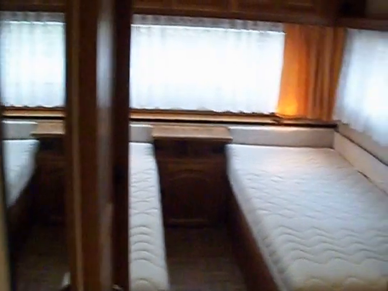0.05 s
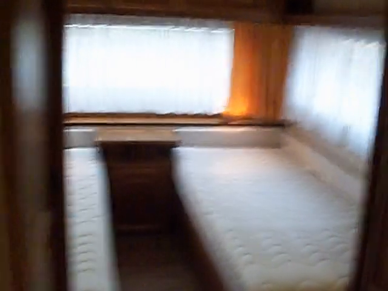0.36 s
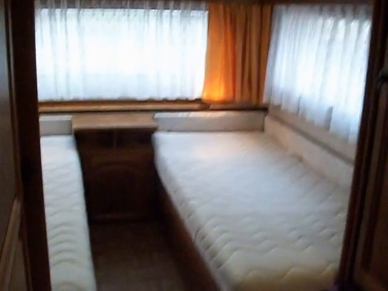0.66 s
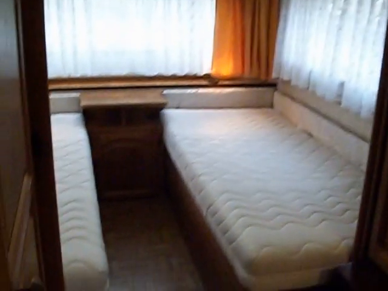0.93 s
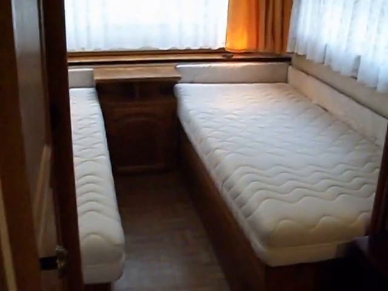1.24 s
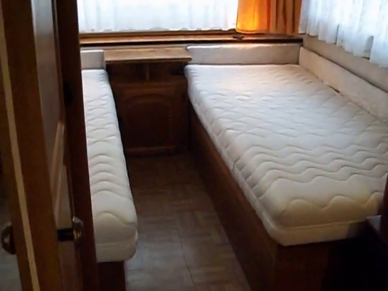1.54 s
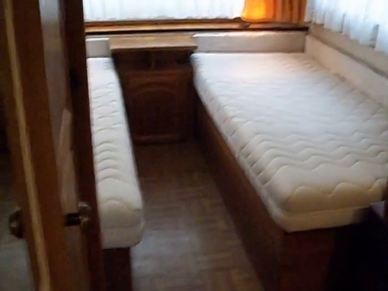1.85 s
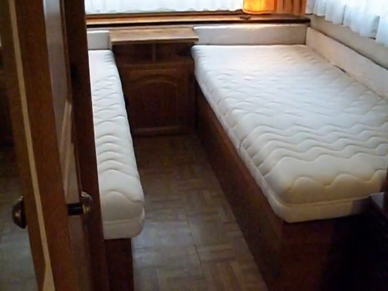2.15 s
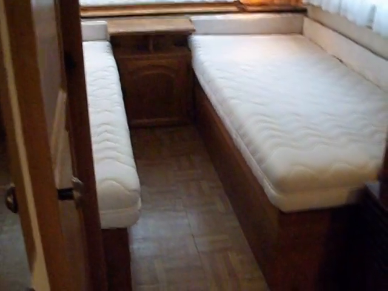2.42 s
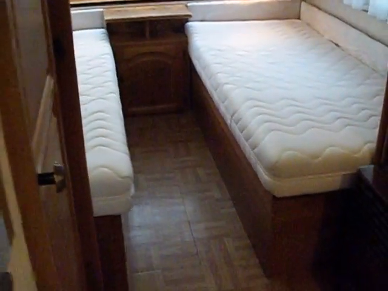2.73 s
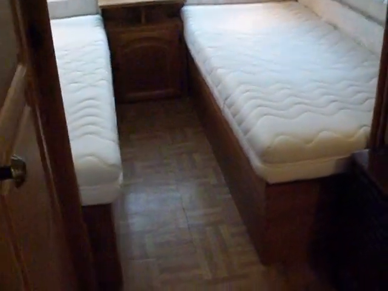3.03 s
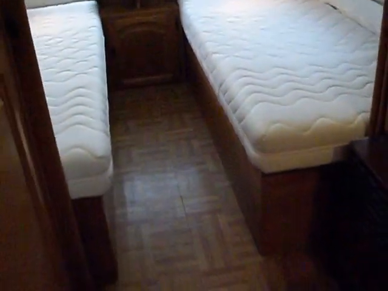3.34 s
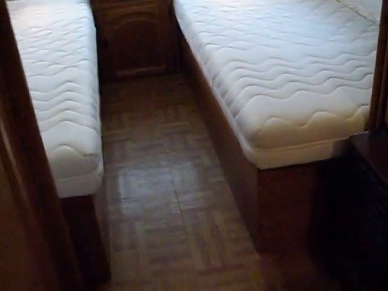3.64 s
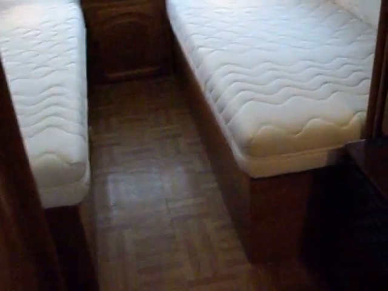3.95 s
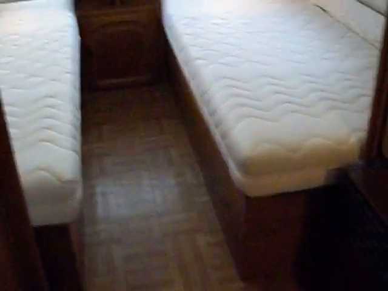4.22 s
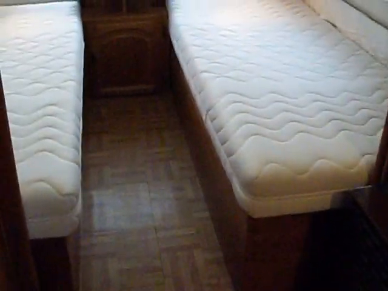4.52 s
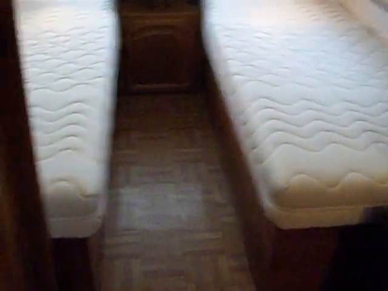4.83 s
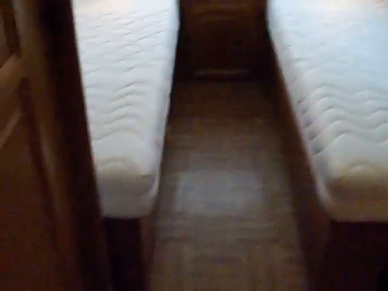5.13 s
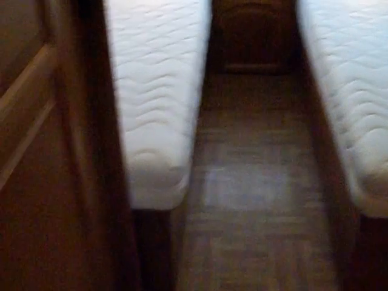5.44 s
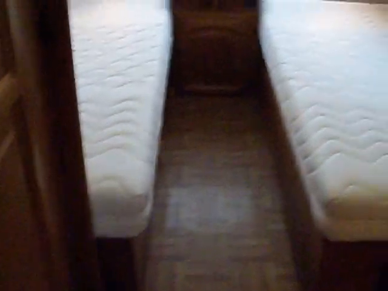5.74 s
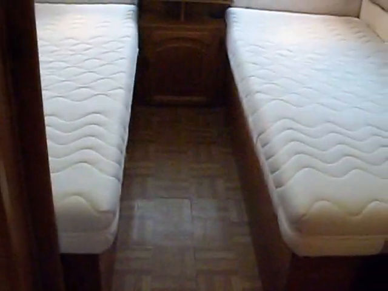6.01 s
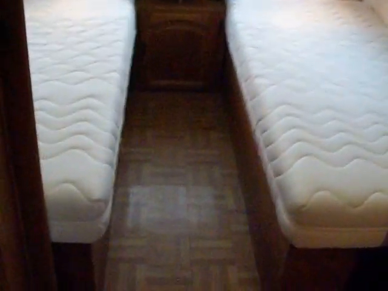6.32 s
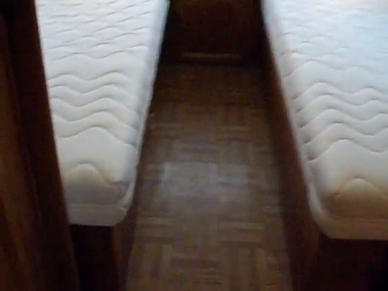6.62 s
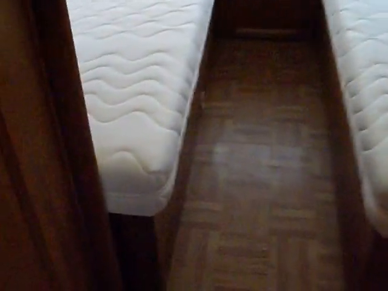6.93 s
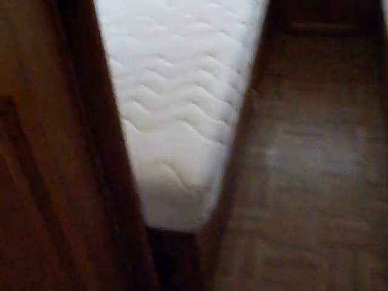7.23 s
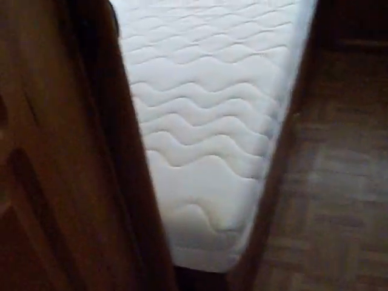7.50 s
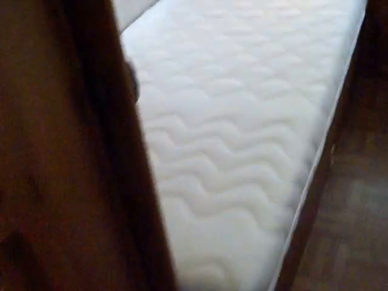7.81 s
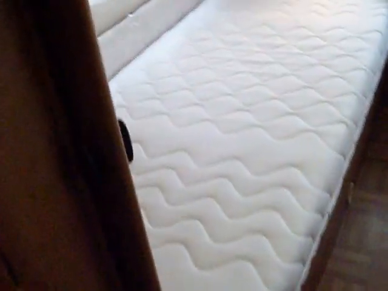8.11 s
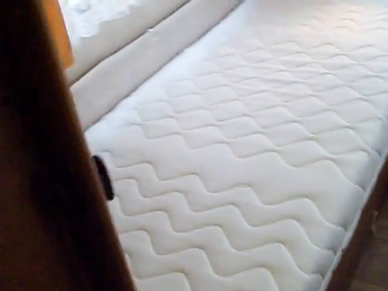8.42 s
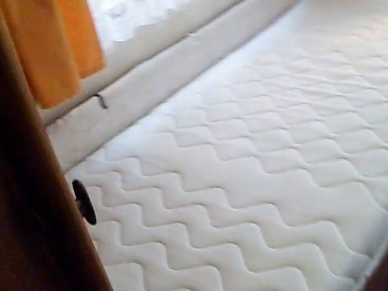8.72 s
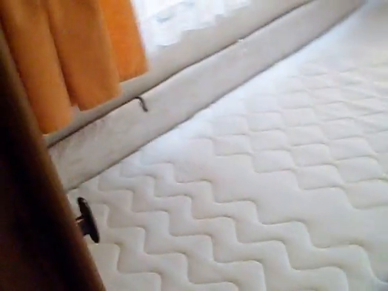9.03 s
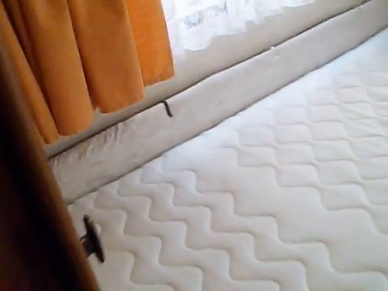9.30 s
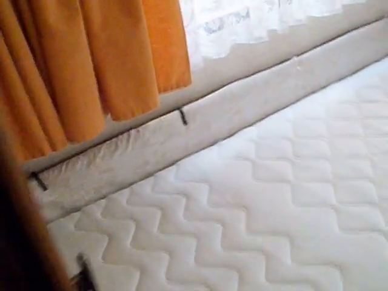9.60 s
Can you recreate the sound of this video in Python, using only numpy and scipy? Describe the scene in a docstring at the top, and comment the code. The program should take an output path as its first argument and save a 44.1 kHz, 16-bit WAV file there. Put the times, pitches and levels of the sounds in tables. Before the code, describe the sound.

Footsteps thud on a thin caravan floor while hollow wooden doors knock, a sliding door grinds along and fittings tick.

```python
"""Inside a small wooden caravan, one small microphone, everything within a few steps of it.
A low hum wavers under a quiet hiss, and clothes rustle as someone walks through and handles the doors.
The thin floor thuds underfoot, loaded joints creak and fittings tick. Hollow plywood doors knock and
chatter in their frames; a sliding door rumbles, grinds and squeaks along its runner.
Each blow rings briefly in the panelled cabin."""
import sys
import numpy as np
from scipy import signal
from scipy.fft import rfft, irfft, next_fast_len
from scipy.io import wavfile
from scipy.ndimage import uniform_filter1d

SR = 44100
rng = np.random.default_rng(int(sys.argv[2]) if len(sys.argv) > 2 else 0)


def transcribe(signal):
    """Save signal, clipped to [-1, 1], as a 16-bit WAV file at the path in sys.argv[1]."""
    frames = np.atleast_2d(signal).T
    limited = np.clip(frames, -1, 1)
    pcm = np.round(limited * 32767).astype(np.int16)
    wavfile.write(sys.argv[1], SR, pcm)


N = 430416
TIME = np.arange(N) / SR
AGE = np.arange(int(0.8 * SR)) / SR   # seconds since a blow
BASS_TOP_HZ, TREBLE_FROM_HZ = 280, 1400   # the middle register lies between


def from_db(db):
    """Decibels to gain."""
    return 10 ** (np.asarray(db) / 20)


def unit_rms(x):
    """Scale to rms 1."""
    return x / np.sqrt(np.mean(x ** 2) + 1e-20)


def at_hz(points, hz):
    """Read a curve on a log-frequency axis."""
    points_hz, values = np.transpose(points)
    return np.interp(np.log(hz), np.log(points_hz), values)


def cut(x, hz, kind, order=3):
    """Butterworth filter."""
    return signal.sosfilt(signal.butter(order, hz, kind, fs=SR, output="sos"), x + 1e-18)


def registers(x):
    """Bass, middle and treble parts of a sound."""
    return (cut(x, [38, BASS_TOP_HZ], "band"), cut(x, [BASS_TOP_HZ, TREBLE_FROM_HZ], "band"),
            cut(x, TREBLE_FROM_HZ, "high"))


def coloured(x, spectrum):
    """Give a steady sound a smooth spectrum."""
    size = next_fast_len(len(x))
    hz = np.maximum(np.arange(size // 2 + 1) * SR / size, 1)
    return irfft(rfft(x, size) * from_db(at_hz(spectrum, hz)), size)[:len(x)]


def resonance(x, hz, width_hz):
    """Two-pole resonance, gain 1 at its peak."""
    radius = np.exp(-np.pi * width_hz / SR)
    feedback = [1, -2 * radius * np.cos(2 * np.pi * hz / SR), radius ** 2]
    return signal.lfilter(np.array([1, 0, -1]) * (1 - radius ** 2) / 2, feedback, x)


def drift(per_s):
    """A random wander of rms 1."""
    return unit_rms(np.interp(TIME * per_s, np.arange(4000), rng.standard_normal(4000)))


def swell(start, end):
    """A smooth rise and fall."""
    return np.sin(np.pi * np.clip((TIME - start) / (end - start), 0, 1))


def ramp(start, rise_s):
    """A straight rise from 0 to 1."""
    return np.clip((TIME - start) / rise_s, 0, 1)


def dying(start, t60):
    """Full until the start, then an even fall in dB."""
    return from_db(-60 * np.maximum(TIME - start, 0) / t60)


def grains(per_s, spread_db):
    """Tiny slips of uneven size, at random moments."""
    sizes = from_db(spread_db * np.minimum(rng.exponential(1, N), 4)) * rng.choice([-1, 1], N)
    return unit_rms(sizes * (rng.random(N) < per_s / SR))


# Hum in the cabin, before its waver: t/s, level/dB
HUM_CURVE = [(0, -61.5), (6.3, -59.5), (7.9, -60.5), (9.1, -54), (9.42, -57), (9.7, -46)]
# Rumble under the room tone: f/Hz, relative level/dB
RUMBLE_SPECTRUM = [(5, -15), (18, 3), (45, 0), (70, -6), (130, -9), (220, -25), (600, -70)]
def room_tone(hum_hz=98.2, sag_at_s=8.8, sag_hz_per_s=8.1, rumble_db=-54.5, shudder_db=-45):
    """A wavering hum swells and sags late on, over a patchy rumble; hand and floor shudder slowly."""
    hz = hum_hz - sag_hz_per_s * np.maximum(TIME - sag_at_s, 0) + 2.185 * drift(9)
    hum_db = np.interp(TIME, *np.transpose(HUM_CURVE)) + 2.5 * drift(8.6)
    hum = from_db(hum_db) * np.sqrt(2) * np.sin(2 * np.pi * np.cumsum(hz) / SR)
    rumble_gain = from_db(rumble_db + 2.5 * drift(3.5))
    rumble = unit_rms(coloured(rng.standard_normal(N), RUMBLE_SPECTRUM))
    shudder = unit_rms(cut(rng.standard_normal(N), [11, 15], "band"))
    return hum + rumble_gain * rumble + from_db(shudder_db) * ramp(3.5, rise_s=0.76) * shudder


# Hiss and cloth at the microphone: f/Hz, relative level/dB
RUSTLE_SPECTRUM = [(76, -51.5), (130, -6), (300, -4.5), (332, 0), (415, -5), (604, -5.5), (895, -5),
                   (1330, -13), (1960, -4.5), (4530, -7), (6480, -18.5), (7690, -40.5), (10000, -91)]
# Movements a few steps away: start t/s, end t/s, low level/dB, treble level/dB
MOVEMENTS = [(-.3, 0.442, -53.5, -84), (0.694, 1.4, -53.5, -61.5), (1.847, 2.342, -51, -69),
             (2.557, 4.91, -52.5, -66), (4.8, 5.977, -55.5, -62), (6.597, 7.54, -55, -59.5),
             (7.72, 8.52, -53.5, -60.5), (8.603, 9.407, -55.5, -63), (9.406, 9.724, -53.5, -60)]
def hiss_and_rustle(hiss_low_db=-57, hiss_treble_db=-62, flutter_db=0.8):
    """The soft rubbing of clothes and hands swells out of the cabin's quiet hiss."""
    power = sum(np.outer(from_db(levels_db), swell(start, end)) ** 2
                for start, end, *levels_db in MOVEMENTS)
    low_gain, treble_gain = np.sqrt(power + from_db([[hiss_low_db], [hiss_treble_db]]) ** 2)
    noise = coloured(rng.standard_normal(N), RUSTLE_SPECTRUM)
    low = from_db(flutter_db * drift(45)) * unit_rms(cut(noise, TREBLE_FROM_HZ, "low"))
    treble = unit_rms(cut(noise, TREBLE_FROM_HZ, "high"))
    return low_gain * low + treble_gain * treble


# Ring time of the panelled cabin: f/Hz, t60/s
CABIN_DECAY = [(60, 0.94), (160, 0.8), (420, 0.41), (1100, 0.49), (2900, 0.46), (7000, 0.15)]
def cabin_ring(noise, count):
    """The cabin rings on after each of `count` blows, longest in the bass."""
    edges_hz = np.geomspace(50, 8000, 12)
    tails = 0
    for low, high in zip(edges_hz, edges_hz[1:]):
        t60 = at_hz(CABIN_DECAY, np.sqrt(low * high))
        band = cut(noise, [low, high], "band", order=2).reshape(count, -1)
        tails += band * from_db(-60 * AGE / t60)
    return tails


def responses(spectrum, modes, low_t60, treble_t60, modes_db, cabin_db, count):
    """A fresh pair for each blow: the crack of the contact, and the ring of body and cabin."""
    noise = unit_rms(coloured(rng.standard_normal(count * len(AGE)), spectrum))
    cracks = sum(cut(noise, TREBLE_FROM_HZ, kind).reshape(count, -1) * from_db(-60 * AGE / t60)
                 for kind, t60 in (("low", low_t60), ("high", treble_t60)))
    tones = np.array([from_db(db - 60 * AGE / t60) * np.sin(2 * np.pi * hz * AGE)
                      for hz, db, t60 in modes])
    shape = count, len(modes)
    strengths = from_db(rng.normal(0, 2.2, shape)) * rng.choice([-1, 1], shape)
    body = from_db(modes_db) * strengths @ tones
    return zip(cracks, body + from_db(cabin_db) * cabin_ring(noise[::-1], count))


def chatter(crack, ring, chatter_s, rebound, count=7):
    """A first contact and a few rebounds; the ring builds up while they last."""
    contacts = crack.copy()
    for when in (np.arange(count) + rng.random(count)) / count:
        lag = int(when * chatter_s * SR)
        strength = rebound * rng.choice([-1, 1]) * rng.uniform(0.46, 1) * (1 - when / 2)
        contacts[lag:] += strength * crack[:len(crack) - lag]
    build_up = 1 - np.exp(-2 * AGE / chatter_s)
    return contacts / np.sqrt(1 + count * rebound ** 2 / 3) + ring * build_up


def add_blow(out, start, sound, levels_db, top_hz):
    """Place a blow with its top blunted; each register's level holds for the first 40 ms."""
    at = int(start * SR)
    parts = registers(cut(sound, top_hz, "low", order=4))[-len(levels_db):]   # two levels: no bass
    for part, db in zip(parts, levels_db):
        attack_rms = np.std(part[:int(0.04 * SR)])
        out[at:at + len(AGE)] += (from_db(db) * part / attack_rms)[:N - at]


def panel_blows(blows, bodies, rebound, spot_width_hz, spot_db=8.5, slack_hz=253, spread_s=0.001):
    """Blows spread over plywood; each spot has its own resonance, stronger where slack and low."""
    out = np.zeros(N)
    for (start, *levels_db, chatter_s, spot_hz), (crack, ring) in zip(blows, bodies):
        softened = crack * (1 - np.exp(-AGE / spread_s))
        sound = chatter(softened, ring, chatter_s, rebound)
        spot = from_db(spot_db) * (slack_hz / spot_hz) * resonance(sound, spot_hz, spot_width_hz)
        add_blow(out, start, sound + spot, levels_db, top_hz=5600)
    return out


# Slipping wooden joints: f/Hz, relative level/dB
CREAK_SPECTRUM = [(150, 11.5), (400, -2), (1000, 6.5), (1600, -7.5), (2600, 0.5), (3500, -11), (4500, -9.5),
                  (5800, -22), (7200, -32)]
# Creaks around the cabin: start t/s, end t/s, middle level/dB, treble level/dB
JOINT_CREAKS = [(0.12, 0.192, -46, -57), (0.975, 1.06, -76, -52), (1.98, 2.008, -46, -44),
                (2.78, 2.88, -62, -48.5), (2.865, 3.006, -39, -46), (5.32, 5.424, -38.5, -38),
                (9.046, 9.128, -50.5, -51.5)]
def creaks():
    """A loaded joint gives way in a crunchy run of slips."""
    slips = coloured(grains(per_s=1900, spread_db=2.0), CREAK_SPECTRUM)
    middle = unit_rms(cut(slips, [150, TREBLE_FROM_HZ], "band"))
    treble = unit_rms(cut(slips, TREBLE_FROM_HZ, "high"))
    return sum(swell(start, end) * (from_db(middle_db) * middle + from_db(treble_db) * treble)
               for start, end, middle_db, treble_db in JOINT_CREAKS)


# Squeaks and groans of runner, door and floor: start t/s, end t/s, f/Hz, width/Hz, level/dB
RUBS = [(3.575, 3.616, 673, 27, -31), (3.602, 3.661, 640, 20, -25), (3.672, 3.719, 320, 36, -32),
        (3.733, 3.82, 530, 13, -30), (3.898, 3.933, 540, 17, -27.5), (3.904, 4.04, 1464, 28, -41.5),
        (4.253, 4.341, 148, 27, -40), (4.496, 4.57, 465, 43, -42.5), (3.82, 3.936, 4700, 120, -46.5),
        (3.83, 3.913, 1010, 9.5, -33.5), (3.84, 4.153, 664, 5.4, -33.5), (3.89, 4.095, 2570, 35, -45.5),
        (4.174, 4.246, 380, 12, -39.5), (4.865, 5.094, 973, 64, -41.5), (4.865, 5.001, 470, 100, -43.5),
        (6.54, 6.599, 243, 28, -37), (8.28, 8.64, 533, 5.5, -55)]
def squeaks():
    """Friction excites one resonance for a moment."""
    out = np.zeros(N)
    for start, end, hz, width_hz, db in RUBS:
        during = (TIME > start) & (TIME < end)
        ring = unit_rms(resonance(rng.standard_normal(SR), hz, width_hz))[-during.sum():]
        out[during] += from_db(db) * np.sin(np.linspace(0, np.pi, len(ring))) * ring
    return cut(out, 5400, "low", order=6)


# Contact on a fitting: f/Hz, relative level/dB
FITTING_CONTACT = [(250, -20.5), (900, -4.5), (1500, -10.5), (2300, 4), (3300, -4), (4250, -0.5),
                   (5800, -8), (7200, -19)]
# Modes of the fittings: f/Hz, relative level/dB, t60/s
FITTING_RING = [(972, 9.5, 0.13), (2380, 1.5, 0.06), (2700, 4.5, 0.055), (2850, 1.5, 0.06),
                (3970, 7, 0.073), (4750, 8.5, 0.07)]
# Catches and joints nearby: t/s, middle level/dB, treble level/dB, chatter/s, f/Hz
FITTING_TICKS = [(0.787,-53.5,-57.5,0.0018,3030), (0.821,-52,-56.5,0.01,2400), (1.027,-57,-51.5,0.003,2610),
                 (1.107,-41,-48.5,0.018,4250), (1.127,-51,-46.5,0.021,2400), (1.174,-58,-53,0.00089,4150),
                 (1.85,-22,-31,0.012,1810), (1.908,-56,-53,0.026,4700), (1.975,-40,-49.5,0.016,4680),
                 (2.033,-39.5,-51.5,0.017,4580), (2.212,-50.5,-62,0.0098,2430), (2.543,-81,-57,0.0025,4170),
                 (2.739,-69,-53,0.002,2470), (2.845,-36,-53,0.013,2300), (2.883,-39,-46.5,0.008,2250),
                 (2.911,-42.5,-47.5,0.014,3480), (2.955,-55,-55,0.01,2600), (3.446,-46,-52,0.0054,2100),
                 (3.887,-50,-42,0.013,4000), (4.152,-39.5,-48,0.012,3950), (4.92,-53,-49,0.0076,3600),
                 (4.938,-67,-42.5,0.018,4000), (5.026,-50,-56,0.0074,3600), (5.34,-48,-46,0.015,3030),
                 (5.372,-46.5,-44.5,0.0099,3260), (5.547,-60,-48,0.0092,2170),
                 (5.73,-58,-51.5,0.00436,2440), (6.848,-60,-53.5,0.0029,2730), (7.444,-66,-59,0.00065,4300),
                 (7.879,-73,-56.5,0.002,4560), (7.911,-49.5,-49.5,0.033,3600), (7.968,-55.5,-58,0.001,4280),
                 (8.098,-55,-51.5,0.01,2420), (8.625,-46.5,-38.5,0.0034,4060), (8.634,-46.5,-43,0.021,3040),
                 (8.796,-57,-56.5,0.02,3330), (9.318,-53.5,-52.5,0.00063,4520)]
def ticks(spot_db=6, spot_width_hz=1100):
    """Small hard parts snap, each at a pitch of its own."""
    out = np.zeros(N)
    bodies = responses(FITTING_CONTACT, FITTING_RING, low_t60=0.054, treble_t60=0.023,
                       modes_db=-27, cabin_db=-12, count=len(FITTING_TICKS))
    for (start, *levels_db, chatter_s, spot_hz), (crack, ring) in zip(FITTING_TICKS, bodies):
        snap = crack + from_db(spot_db) * resonance(crack, spot_hz, spot_width_hz)
        add_blow(out, start, chatter(snap, ring, chatter_s, rebound=1.0), levels_db, top_hz=4970)
    return out


# Contact of foot and floor: f/Hz, relative level/dB
FLOOR_CONTACT = [(60, -5.5), (200, 2.5), (400, 6), (900, 6.5), (1500, -17.5), (2600, -11), (3400, -22.5),
                 (4600, -20), (5800, -28), (7200, -73)]
# Modes of the floor: f/Hz, relative level/dB, t60/s
FLOOR_RING = [(49.2, 5.5, 0.55), (93, 6.5, 0.58), (115.3, 9.5, 0.3), (190, -1, 0.47), (555, -2.5, 0.24),
              (980, 26, 0.012)]
# Feet near the microphone: t/s, bass level/dB, middle level/dB, treble level/dB, chatter/s, spot f/Hz
FOOTFALLS = [(0.755, -44.5, -50, -53.5, 0.021, 840), (1.69, -31, -36, -43, 0.012, 1020),
             (1.793, -45, -38, -39, 0.026, 564), (2.747, -63, -44, -45, 0.017, 865),
             (2.843, -38.5, -39.5, -42, 0.0057, 194), (2.881, -35.5, -31.5, -40, 0.0059, 190),
             (5.344, -43, -45, -56, 0.021, 310), (5.376, -48, -55, -49, 0.015, 262),
             (5.515, -36, -36, -39, 0.0053, 203), (6.546, -40.5, -47, -50.5, 0.006, 252),
             (6.725, -52, -53.5, -56, 0.021, 290), (7.068, -46.5, -48.5, -51, 0.017, 354),
             (7.638, -48.5, -50, -60, 0.0095, 685), (7.76, -47, -52, -56.5, 0.018, 283),
             (7.814, -42, -46, -56, 0.0032, 570), (8.155, -56, -44.5, -52, 0.018, 297),
             (8.665, -54, -48.5, -71, 0.0039, 600)]
def footsteps():
    """The thin floor thuds and rattles under each foot."""
    bodies = responses(FLOOR_CONTACT, FLOOR_RING, low_t60=0.11, treble_t60=0.11,
                       modes_db=-13, cabin_db=-2, count=len(FOOTFALLS))
    return panel_blows(FOOTFALLS, bodies, rebound=0.69, spot_width_hz=27)


# The slide, a row each for rumble, roll, scrape and hiss:
# eased level/dB, shoved level/dB, shove rise/s, loss/(dB/s)
SLIDE_BANDS = [(-46.5, -32.5, 0.027, 15.5), (-53, -30, 0.016, 8), (-61.5, -36.5, 0.024, 10.5),
               (-82, -61.5, .02, -9)]
# A glider catches: t/s, roll level/dB, scrape level/dB, hiss level/dB, rise/s, t60/s
GLIDER_CATCHES = [(3.578, -30.5, -37, -45, 0.023, 0.44), (3.75, -27.5, -36, -64.5, 0.032, 0.97),
                  (3.86, -36.5, -40, -44.5, 0.051, 0.61), (4.144, -40, -33, -47, 0.0064, 0.76),
                  (4.193, -25, -37, -47, 0.0084, 0.29)]
def slide_gains(ease_s=3.1, shove_s=3.578, stop_s=4.49):
    """Gains of the four bands as the door is eased, shoved and stopped, grinding at each catch."""
    power = np.zeros((len(SLIDE_BANDS), N))
    for band, (eased_db, shoved_db, rise_s, loss_db_per_s) in enumerate(SLIDE_BANDS):
        eased = from_db(eased_db) * ramp(ease_s, rise_s=0.062)
        shoved = from_db(shoved_db - loss_db_per_s * (TIME - shove_s)) * ramp(shove_s, rise_s)
        power[band] = eased ** 2 + shoved ** 2
    for start, *levels_db, rise_s, t60 in GLIDER_CATCHES:
        grind = ramp(start, rise_s) * dying(start + rise_s, t60)
        power[1:] += np.outer(from_db(levels_db), grind) ** 2
    return np.sqrt(power) * dying(stop_s, t60=0.67)


def travelling(ring, bend=0.013, swing_db=3, changes_per_s=12):
    """As the gliders travel along the panel, a resonance bends in pitch and comes and goes."""
    warped_time = TIME + bend * np.cumsum(drift(changes_per_s)) / SR
    return np.interp(warped_time, TIME, ring) * from_db(swing_db * drift(changes_per_s))


# Resonances of the door on its runner: f/Hz, width/Hz, relative level/dB
SLIDER_RING = [(150, 70, -1), (365, 55, 1), (540, 60, -1), (648, 34, 2.5), (717, 18, -3), (1020, 28, -2),
               (1490, 26, -10), (1170, 110, -8), (1750, 54, -17), (2210, 80, -15), (2520, 45, -11),
               (4310, 250, -23)]
# The panel's broad response: f/Hz, relative level/dB
SLIDER_SPECTRUM = [(60, 1.5), (130, -4.5), (400, -4.5), (750, -2.5), (1100, -0.5), (1450, -4),
                   (2600, -15.5), (3300, -26.5), (4500, -17.5), (5600, -21.5), (6800, -47), (7800, -55)]
def sliding_door(judder_db=1.3, hiss_from_hz=3400):
    """Gliders bump over the grain of the runner and shake the panel."""
    friction = grains(per_s=600, spread_db=1.5) + 0.65 * rng.standard_normal(N)
    force = friction * from_db(judder_db * drift(70))
    ring = 2 * sum(from_db(db) * travelling(resonance(force, hz, width_hz))
                   for hz, width_hz, db in SLIDER_RING)
    panel = coloured(force, SLIDER_SPECTRUM) + ring
    rumble, roll, treble = registers(cut(panel, 5400, "low", order=6))
    scrape = cut(treble, hiss_from_hz, "low", order=4)
    hiss = cut(treble, hiss_from_hz, "high", order=4)
    # Each band is evened out over 0.1 s, so the door's motion sets its level.
    evened = [band / np.sqrt(uniform_filter1d(band ** 2, size=int(0.1 * SR)) + 1e-12)
              for band in (rumble, roll, scrape, hiss)]
    return sum(gain * band for gain, band in zip(slide_gains(), evened))


# Contact on the door: f/Hz, relative level/dB
DOOR_CONTACT = [(60, -5), (150, -7.5), (330, -6.5), (650, 0.5), (1000, -6), (1550, -13.5), (2700, -3.5),
                (3300, -35), (4200, -11.5), (5200, -29.5), (7200, -78.5)]
# Modes of the hollow door: f/Hz, relative level/dB, t60/s
DOOR_RING = [(102, -7, .55), (135, -7.5, .4), (190, -10, .4), (269, -15, .35), (365, -9, .3),
             (520, -10, .24), (592, -8, .13), (675, 1.5, .16), (893, -4, .17), (1010, -8.5, .08),
             (1103, -9, .22), (1218, -14, .22), (1348, -14, .28), (1491, -11, .22), (1629, -10, .25),
             (1899, -13, .18), (2155, -13, .22), (2575, -12, .22), (2745, -12, .14)]
# Door and frame, a few steps from the microphone:
# t/s, bass level/dB, middle level/dB, treble level/dB, chatter/s, spot f/Hz
DOOR_BLOWS = [(0.002,-50.5,-45,-62,0.007,596), (0.421,-34.5,-29,-51,0.02,567),
              (0.915,-44,-39,-60,0.024,690), (1.093,-28.5,-20,-40,0.0098,640),
              (1.851,-31,-19.5,-29.5,0.012,830), (1.864,-24.5,-23.5,-48,0.0018,730),
              (1.902,-30.5,-33,-45,0.016,600), (2.106,-43.5,-40,-62,0.021,704),
              (3.578,-49,-30.5,-36.5,0.012,620), (3.616,-51,-29.5,-38.5,0.0045,614),
              (4.528,-39,-37.5,-73,0.029,465), (4.63,-43,-50.5,-71,0.009,390),
              (4.921,-37,-28,-43.5,0.021,427), (4.94,-35,-27,-43,0.022,345),
              (7.013,-47,-39.5,-50,0.015,1160), (8.59,-48.5,-48,-54,0.0072,950),
              (8.699,-48,-45,-73,0.0028,790), (8.788,-52,-47.5,-54.5,0.011,740),
              (9.608,-56,-54,-66,0.012,405)]
def door_knocks():
    """Hollow plywood takes each blow and chatters against its frame."""
    bodies = responses(DOOR_CONTACT, DOOR_RING, low_t60=0.052, treble_t60=0.067,
                       modes_db=-13.5, cabin_db=-10, count=len(DOOR_BLOWS))
    return panel_blows(DOOR_BLOWS, bodies, rebound=0.5, spot_width_hz=69)


def scene():
    """The caravan in mono, everything within a few steps of the microphone."""
    blows = door_knocks() + footsteps() + ticks()
    rubbing = creaks() + sliding_door() + hiss_and_rustle() + squeaks()
    return (blows + rubbing + room_tone())[None]


def record(dry):
    """A small microphone with a narrow top, 55 dB down from 7950 Hz."""
    return signal.sosfilt(signal.cheby2(14, 55, 7950, fs=SR, output="sos"), dry)


dry = scene()
out = record(dry)
transcribe(out)
```